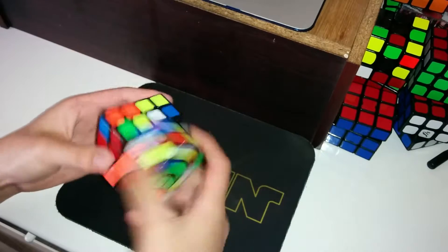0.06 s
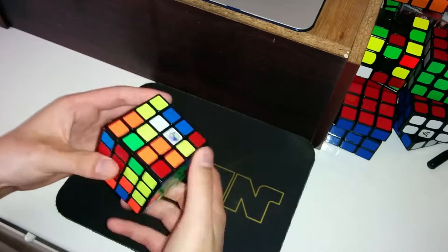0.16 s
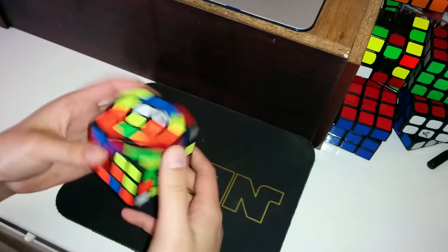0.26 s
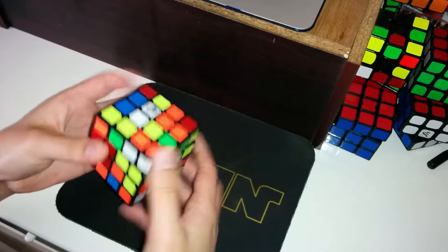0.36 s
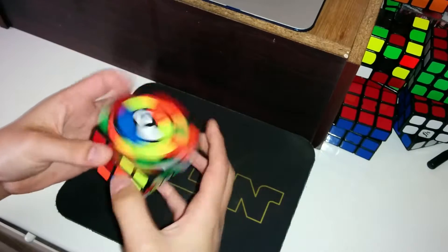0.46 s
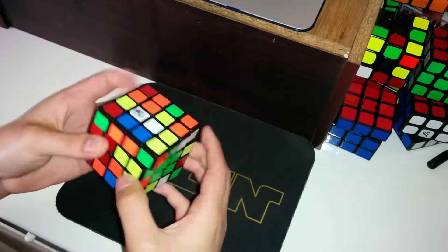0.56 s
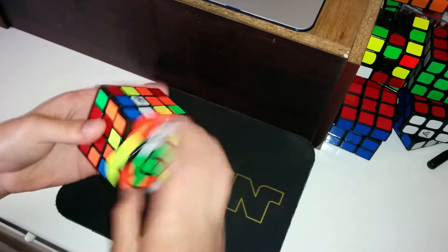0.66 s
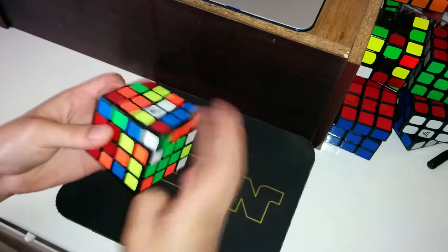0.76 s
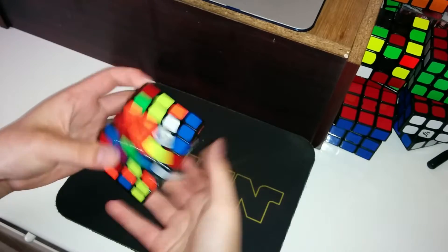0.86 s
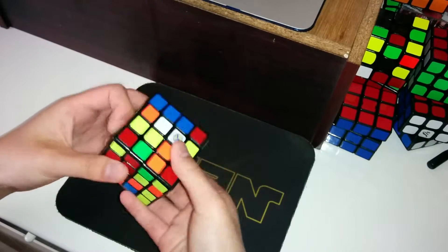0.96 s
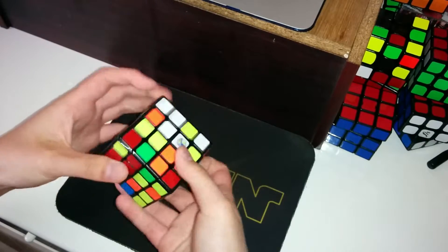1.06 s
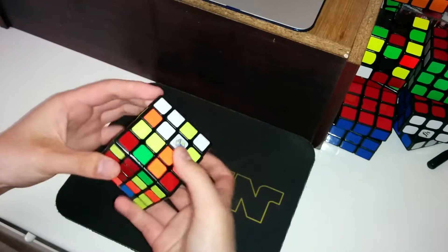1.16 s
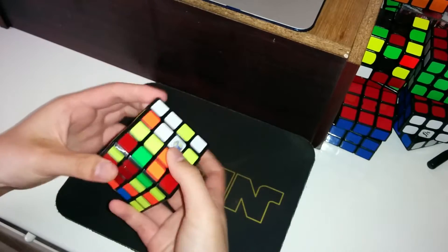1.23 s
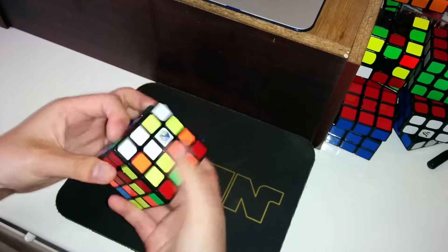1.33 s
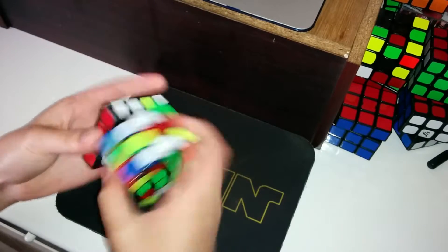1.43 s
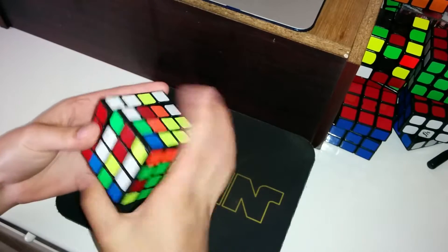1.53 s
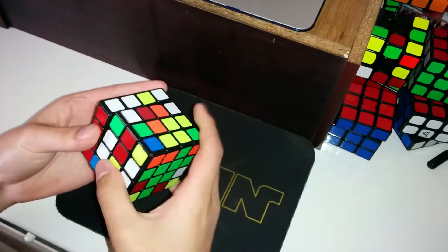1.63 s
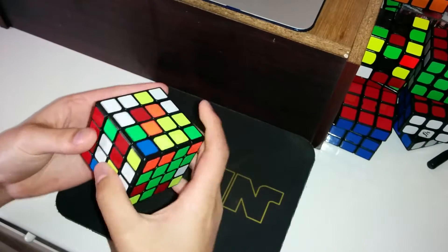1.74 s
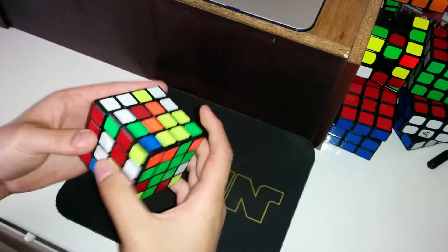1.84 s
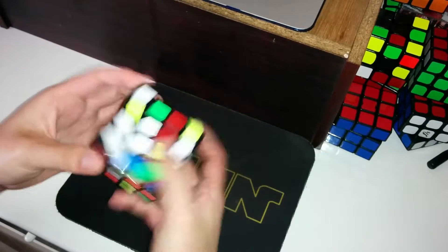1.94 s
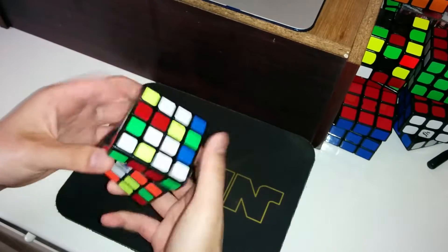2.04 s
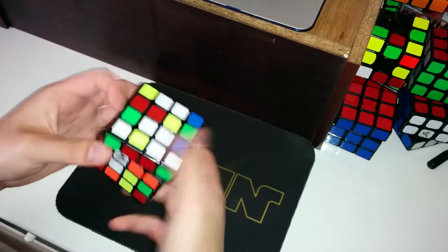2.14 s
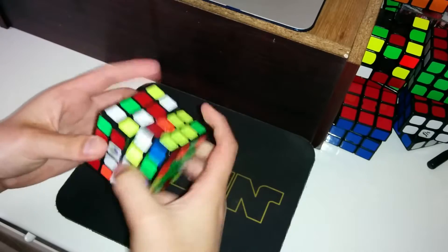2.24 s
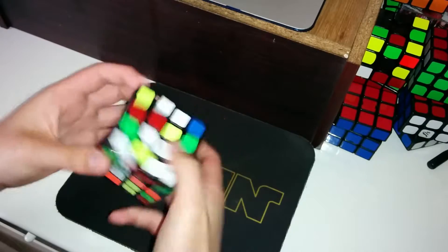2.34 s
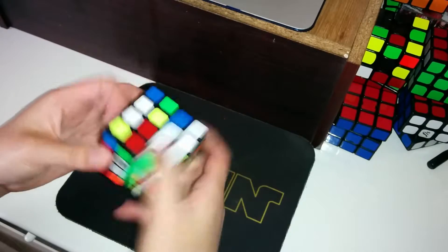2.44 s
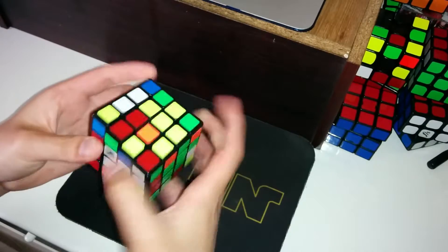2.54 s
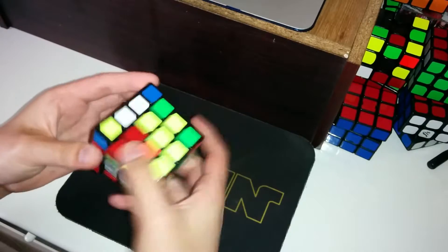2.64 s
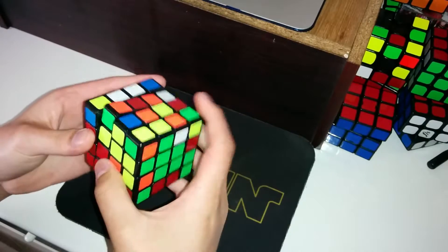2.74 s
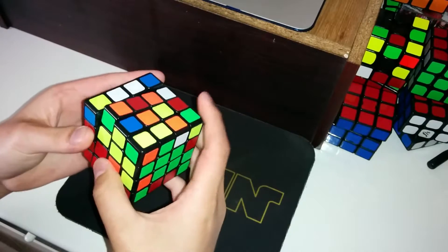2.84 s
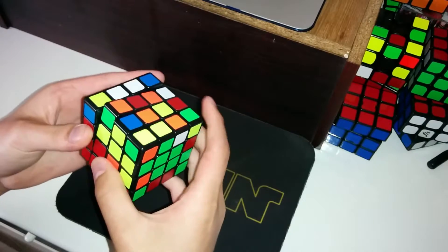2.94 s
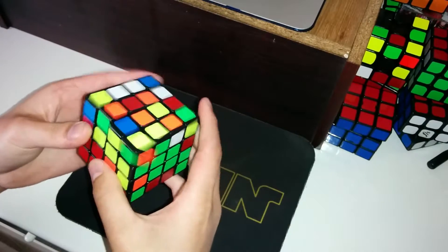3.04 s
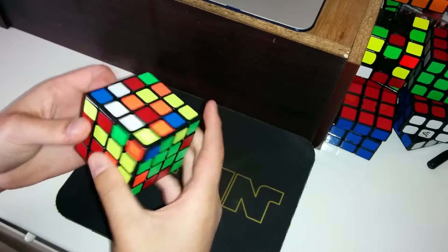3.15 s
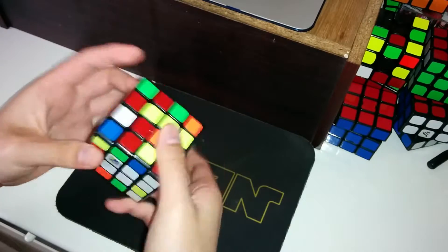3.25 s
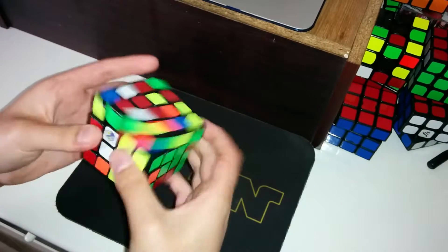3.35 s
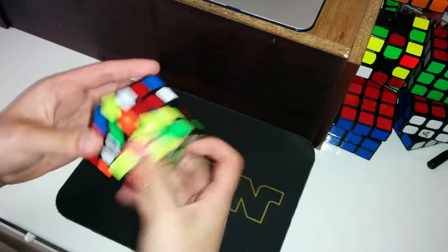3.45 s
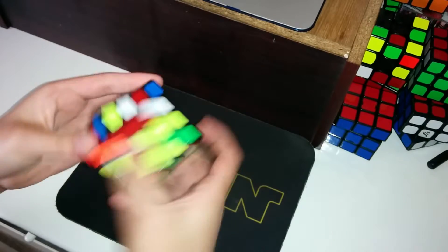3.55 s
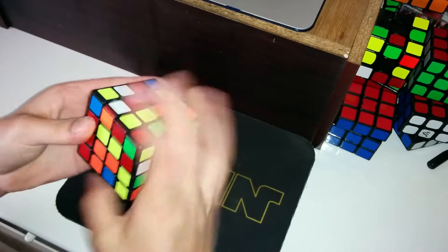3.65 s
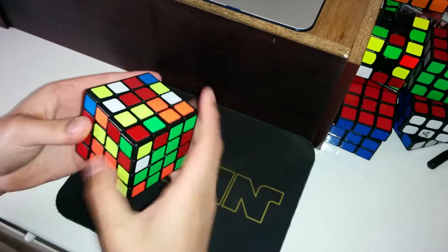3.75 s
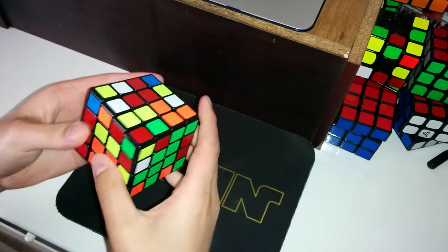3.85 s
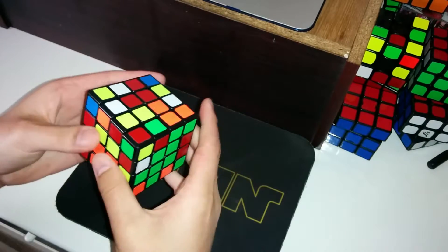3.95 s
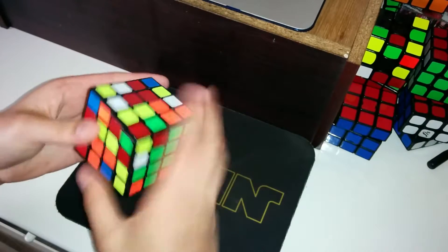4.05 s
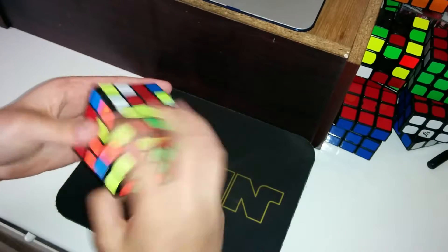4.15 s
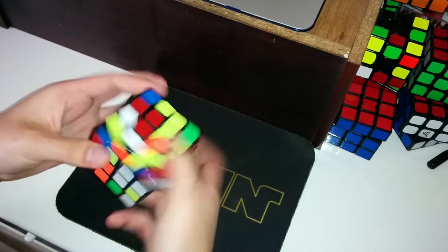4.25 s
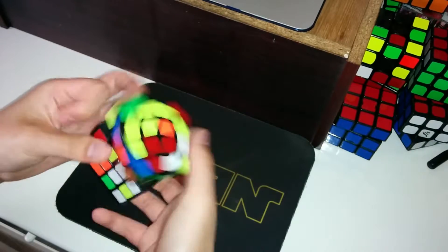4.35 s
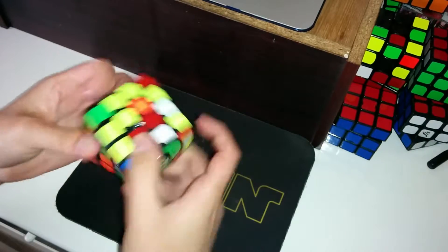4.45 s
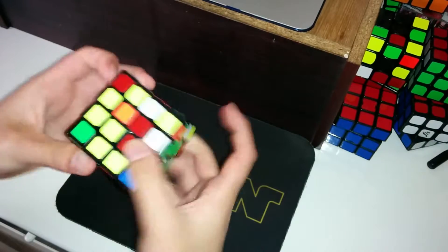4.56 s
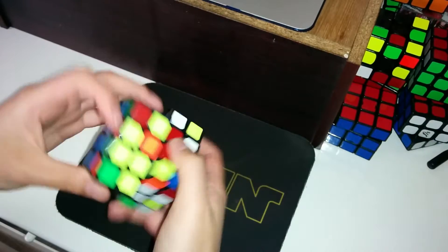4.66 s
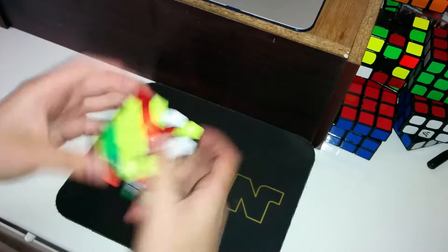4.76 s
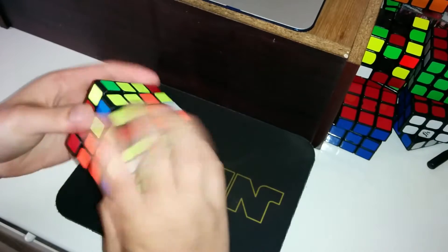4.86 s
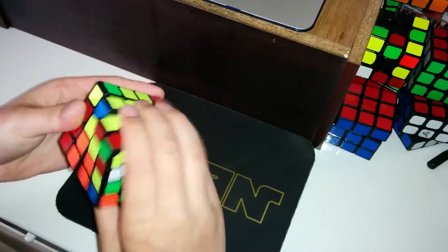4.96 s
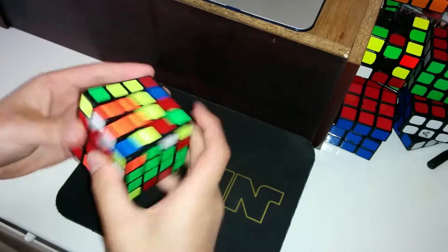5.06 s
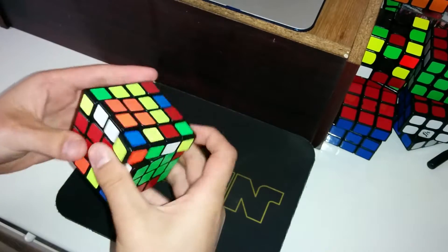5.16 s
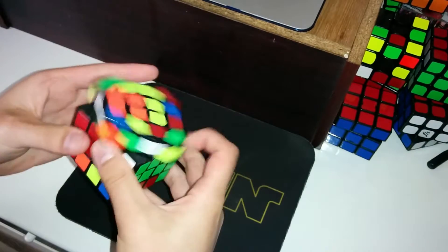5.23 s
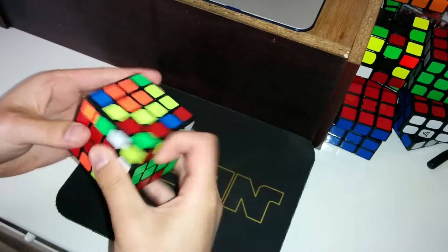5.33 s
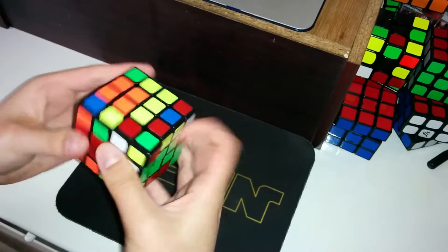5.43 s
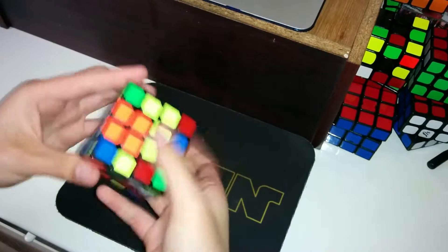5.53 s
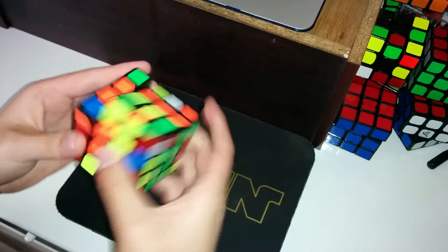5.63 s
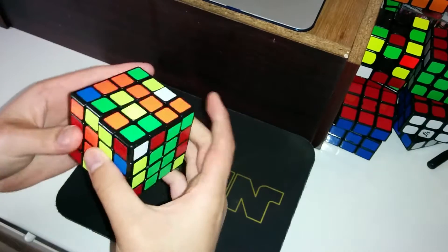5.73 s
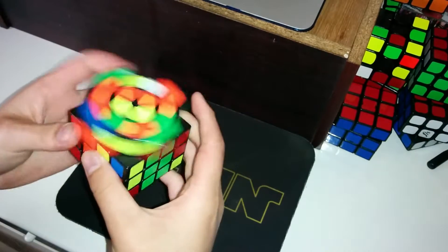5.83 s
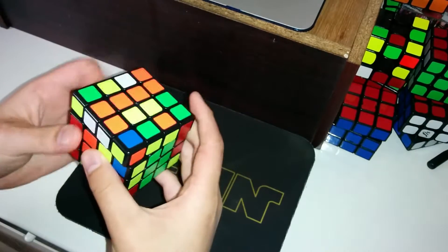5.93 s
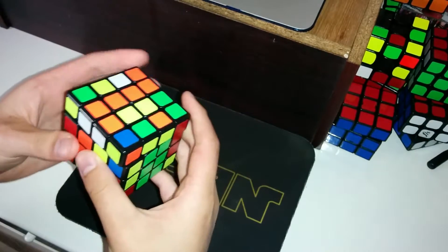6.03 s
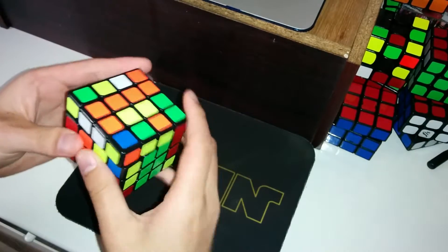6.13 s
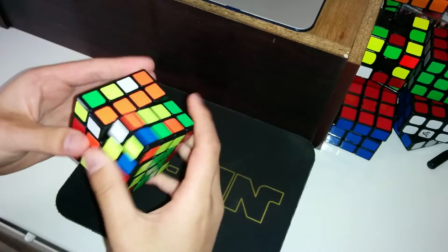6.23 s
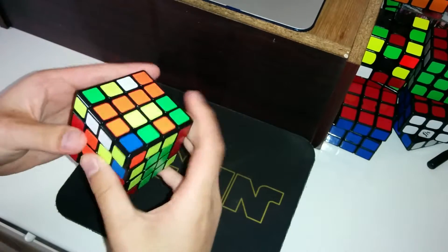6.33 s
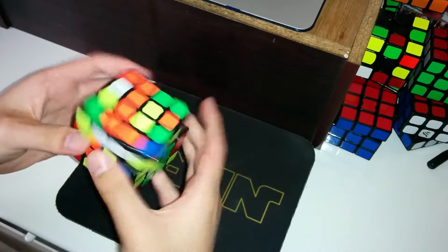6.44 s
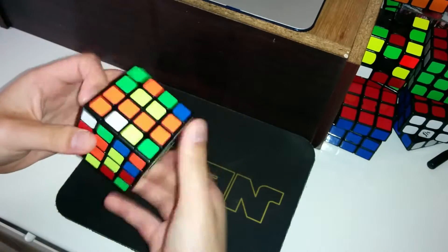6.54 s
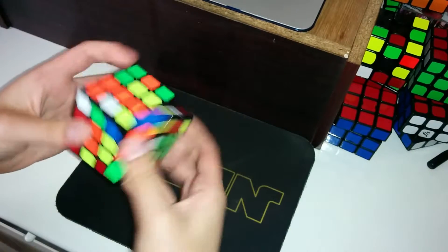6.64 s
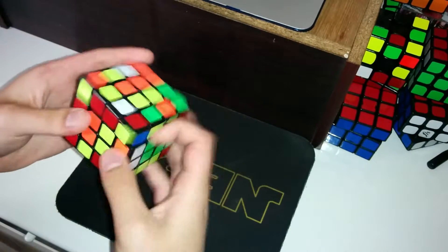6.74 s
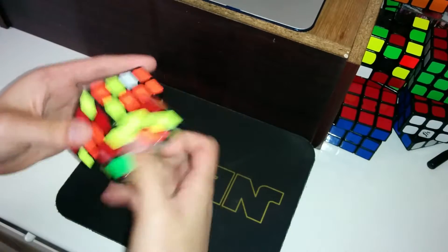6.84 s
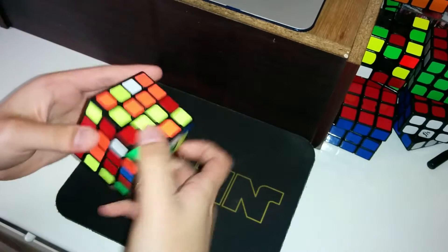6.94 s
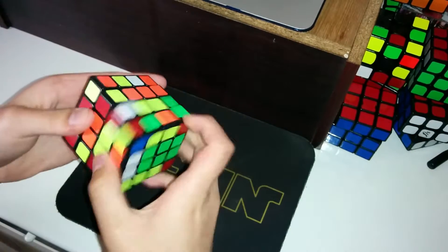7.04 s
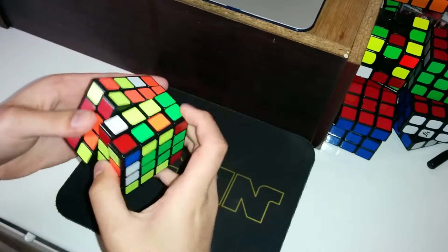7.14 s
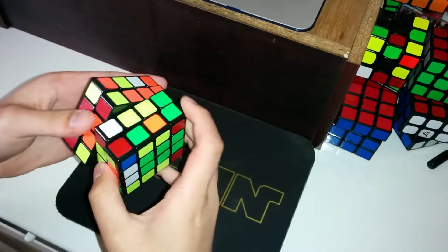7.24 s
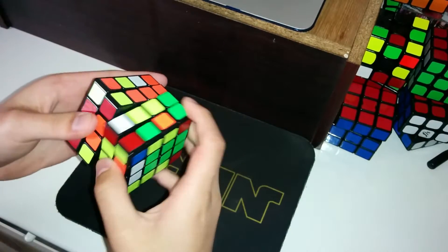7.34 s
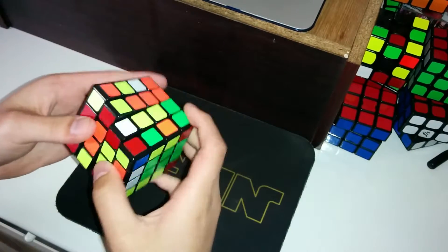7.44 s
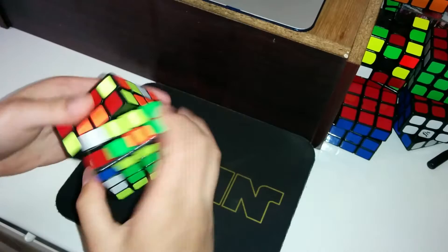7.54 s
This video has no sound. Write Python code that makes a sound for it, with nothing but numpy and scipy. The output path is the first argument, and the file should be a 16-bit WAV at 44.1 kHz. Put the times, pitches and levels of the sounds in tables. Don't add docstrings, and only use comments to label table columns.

```python
import sys
import numpy as np
from scipy import signal
from scipy.io import wavfile
from scipy.ndimage import uniform_filter1d

SR = 44100
rng = np.random.default_rng(int(sys.argv[2]) if len(sys.argv) > 2 else 0)


def materialize(psi):
    bounded = np.clip(np.atleast_2d(psi).T, -1, 1)
    quanta = np.round(bounded * 32767).astype(np.int16)
    wavfile.write(sys.argv[1], SR, quanta)


def nominal_scale(level):
    x = np.asarray(level, float) / 20
    return 10 ** x


N = 334719

RISE_S = .0012
# start_s, level_db, hollow_db, bright_db, ring_hz
KNOCKS = [(0.1771, -33.5, 4.5, -1, 1600), (0.2187, -42, -7, -2, 4600), (.9928, -43, -8, 0, 4600),
          (1.1722, -42, -8, 0, 4600), (2.0878, -28, -3, 0, 5000), (2.2927, -35, -8, 0, 4600),
          (2.3049, -38, -8, -0.5, 4600), (2.478, -35, -7.5, 0, 4600), (2.5423, -44, -8, 0, 4600),
          (2.572, -35, -8, 0, 4600), (2.8314, -48, -8, -7, 4200), (3.2225, -39, -8, -1, 4600),
          (3.3452, -36, -8, -0.5, 4600), (3.4772, -29, -2.5, -0.5, 5000), (3.615, -52, -8, 0, 4598),
          (4.3168, -41, -8, 0, 4600), (5.003, -45, -3.5, -5, 4600), (5.3307, -45, -8, 0, 4600),
          (5.4495, -37, -16, -1, 5200), (6.569, -39.5, -10, 9.5, 9030), (6.776, -38, -8, 5, 11000),
          (6.9516, -42, -8, 0, 4600)]


def rms_one(x):
    return x / np.sqrt(np.mean(x ** 2) + 1e-20)


def drift(rate):
    r = np.exp(-80 * np.pi * rate / SR)
    slow = signal.lfilter([1], [1, -2 * r, r * r], rng.standard_normal(N // 40 + 2002))[2000:]
    return np.interp(np.arange(N) / 40, np.arange(len(slow)), rms_one(slow))


def resonance(x, hz, width_hz):
    r = np.exp(-np.pi * width_hz / SR)
    zeros = np.array([1, 0, -1]) * (1 - r * r) / 2
    poles = [1, -2 * r * np.cos(2 * np.pi * hz / SR), r * r]
    return signal.lfilter(zeros, poles, x)


def butter(x, order, edge_hz, kind):
    return signal.sosfilt(signal.butter(order, edge_hz, kind, fs=SR, output="sos"), x)


def banded_noise(spectrum, patchy_db, patch_rate):
    hz_points, db_points = np.transpose(spectrum)
    edges_hz = 20 * 2 ** np.arange(0, 9.8, 1 / 4)
    white = rng.standard_normal((2, N))
    out = 0
    for k, (low_hz, high_hz) in enumerate(zip(edges_hz, edges_hz[1:])):
        hz = np.sqrt(low_hz * high_hz)
        level_db = np.interp(np.log(hz), np.log(hz_points), db_points, left=-80)
        lumpiness = np.exp(-np.log(hz / 700) ** 2 / 2)
        flicker_db = patchy_db * drift(patch_rate) * lumpiness
        out = out + nominal_scale(level_db + flicker_db) * butter(white[k % 2], 2, [low_hz, high_hz], "band")
    return rms_one(out)


def cube():
    # pitch_hz, width_hz, level_db
    hollow_modes = [(410, 85, -13.5), (555, 210, -10.5), (956, 45, -1), (1240, 110, 4.5), (1600, 190, 0),
                    (1937, 130, -3.5), (2500, 740, -13.5)]
    shell_modes = [(2540, 460, -2.5), (2880, 370, -1), (3510, 860, 2), (4150, 430, 2.5), (4650, 460, 2.5),
                   (5260, 300, 0.5), (5680, 420, -1), (6500, 370, -1)]
    edge_modes = [(6700, 810, -5.5), (8950, 3000, 2), (9800, 350, -0.5), (10730, 430, -3),
                  (12240, 820, 0.5), (14800, 2100, -8)]
    start_s, level_db, hollow_db, bright_db, _, ring_hz = np.transpose(clacks())
    count, knocks = len(start_s), len(KNOCKS)
    turn_db, grip_db = slide_db()
    sliding = np.maximum(nominal_scale(2 * turn_db) - nominal_scale(2 * -58), 0)
    shared = contacts(per_s=4500, spread_db=6.2)
    colour_db = np.resize(rng.normal(0, 2.15, (count - knocks, 24)), (count, 24))

    blow_at = np.round((start_s + RISE_S) * SR).astype(int)
    hard_blow_db = 10.5 + 0.29 * (level_db + 24)
    blow_db = np.where(np.arange(count) < len(hard_clacks()), hard_blow_db, 4)
    blow_db[-knocks:] = 8

    # modes, clack_db, sliding_db, decay share (treble dies first), extra blow_db
    parts = [(hollow_modes, hollow_db + 11.5, grip_db + 1.1, .38, 3),
             (shell_modes, 2.5, 1.0, .34, 0),
             (edge_modes, bright_db + 1.5, -1.1, .3, 0)]
    out, k = 0, 0
    for modes, part_db, slide_gain_db, quick, snap_db in parts:
        for hz, width_hz, mode_db in modes:
            favoured_db = 10.4 * np.exp(-(np.log(hz / ring_hz) / 0.062) ** 2)
            strength_db = level_db + part_db + colour_db[:, k] + favoured_db
            power = rattle(strength_db, quick, tail_db=-13.5, tail_t60_s=0.11)
            grip_change_db = 4.5 * drift(38)
            power += sliding * nominal_scale(2 * slide_gain_db + 2 * grip_change_db)
            own = contacts(per_s=6400, spread_db=5.0)
            drive = np.sqrt(power) * (0.55 * shared + 0.78 * own)
            drive[blow_at] += nominal_scale(strength_db + blow_db + snap_db)
            out = out + (-1) ** k * nominal_scale(mode_db) * resonance(drive + 1e-18, hz, width_hz)
            k += 1
    out = butter(out, 1, 730, "high")
    return butter(out, 8, 385, "high")


def contacts(per_s, spread_db):
    sizes = nominal_scale(spread_db * np.minimum(rng.exponential(1, N), 3.2)) * rng.choice([-1, 1], N)
    return rms_one(sizes * (rng.random(N) < per_s / SR))


def slide_db():
    # push_s, fastest_s, push_db, top_db, hollow_db
    layer_turns = [(0.162, 0.18, -45, -36, .1), (.372, 0.42, -40, -37.5, 1.5),
                   (0.566, 0.58, -40.5, -30.5, 1), (0.747, 0.8, -42, -39.5, -1),
                   (0.822, 0.86, -40.5, -26, -1.5), (0.979, 1.032, -53, -36, 0.5),
                   (1.128, 1.158, -57, -43, -3), (1.38, 1.408, -46, -28.5, 1),
                   (1.49, 1.576, -40.5, -43.5, 2), (2.031, 2.094, -45.5, -27, -1),
                   (2.25, 2.324, -49.5, -37.5, .1), (2.408, 2.428, -45, -45.5, .1),
                   (2.459, 2.497, -42.5, -29, 0.5), (2.543, 2.586, -43.5, -33.5, 1),
                   (3.175, 3.211, -45.5, -39.5, 0.5), (3.286, 3.4, -43.5, -46.5, .1),
                   (3.39, 3.46, -57, -34, -2), (3.5, 3.59, -33.5, -39, .1), (3.656, 3.73, -38, -40, .1),
                   (4.293, 4.4, -46, -28.5, 0.2), (4.44, 4.514, -34, -45, -2), (4.55, 4.54, -42.5, -54, 1),
                   (4.688, 4.706, -53.5, -50, .1), (4.854, 4.96, -36.5, -31.5, 1),
                   (5.321, 5.3, -50.5, -48, 1), (5.426, 5.43, -51.5, -51, -6), (5.542, 5.54, -58, -48, -9),
                   (5.692, 5.717, -48, -29.5, 2), (5.928, 5.953, -52, -35.4, -1),
                   (6.566, 6.578, -47, -35.5, -3), (6.702, 6.83, -44.5, -40.5, 0.5),
                   (6.935, 6.955, -51.5, -52, 2), (7.076, 7.07, -58, -51, .1)]
    start_db_s, slowing_db_s = 1801, 360
    t = np.arange(N) / SR
    level_db, hollow_db = np.full(N, -99.), np.zeros(N)
    for push_s, fastest_s, push_db, top_db, grip_db in layer_turns:
        speeding_db = np.interp(t, [push_s, max(fastest_s, push_s + RISE_S)], [push_db, top_db])
        before_db = start_db_s * np.maximum(push_s - t, 0)
        after_db = slowing_db_s * np.maximum(t - fastest_s, 0)
        turn_db = speeding_db - before_db - after_db
        hollow_db = np.where(turn_db > level_db, grip_db, hollow_db)
        level_db = np.maximum(level_db, turn_db)
    return level_db, hollow_db


def rattle(strength_db, quick, tail_db, tail_t60_s):
    lead = SR // 40
    power = np.zeros(N + SR)
    t = (np.arange(SR // 6) - lead) / SR
    after = np.maximum(t, 0)
    grinding = nominal_scale(2 * (-11.0 + 5000 * np.minimum(t, 0)))
    attack = np.maximum(np.minimum(after / RISE_S, 1) ** 2, grinding)
    tail = nominal_scale(2 * tail_db - 120 * after / tail_t60_s)
    for (start_s, _, _, _, t60_s, _), level_db in zip(clacks(), strength_db):
        shape = nominal_scale(-120 * after / max(t60_s * quick, .01)) + tail
        i = round(start_s * SR) - lead
        power[i:i + len(t)] += nominal_scale(2 * level_db) * shape * attack
    return power[:N]


def clacks():
    # start_s, level_db, bright_db, ring_hz
    light_ticks = [(0.1276, -51.5, -20, 5160), (0.147, -46.5, -10, 5860), (0.3773, -44, -8, 9400),
                   (0.39, -37, 4, 4400), (0.473, -50.5, 7, 3960), (0.484, -50, -8.0, 3880),
                   (0.5375, -51, 5.5, 8960), (0.551, -48, 7.5, 3270), (0.743, -32.5, -1, 6030),
                   (1.103, -57, 10, 3860), (1.1124, -42, 3, 11900), (1.215, -47.5, 1, 5130),
                   (1.255, -68, 8, 10340), (1.754, -66.0, -1.5, 2670), (1.974, -49.5, -4.0, 3960),
                   (1.9816, -41.5, 2, 12300), (2.003, -49, -9, 4200), (2.014, -42, -4.0, 3270),
                   (2.1568, -39, 2, 4300), (2.1666, -42, 5, 7840), (2.2427, -39, -16.0, 3700),
                   (2.302, -40, 0.5, 3360), (2.3763, -47, 1.0, 2760), (2.391, -41.5, 5.5, 2500),
                   (2.634, -50, -11, 4600), (2.749, -58, 7, 3080), (2.765, -52.5, 2, 10420),
                   (2.786, -51, 2, 10420), (2.798, -38.5, -5.0, 4000), (2.8103, -36, -2.5, 4150),
                   (3.176, -38, -13, 5280), (3.227, -40, 8.5, 10510), (3.237, -34.5, -3, 5340),
                    (3.3033, -34.5, -3.0, 4300), (3.327, -34, 4.5, 6550), (3.6, -46, 0.0, 4650),
                    (3.758, -47.5, 8.5, 10800), (4.183, -71.5, 11.5, 3220), (4.2484, -58.5, 6, 10250),
                    (4.264, -53, 0, 2900), (4.278, -52, -1, 4130), (4.289, -56, 6.0, 8530),
                    (4.324, -35, -2.0, 5680), (4.5117, -41, -2.0, 5680), (4.523, -34, -10, 6160),
                    (4.599, -57.5, 13.5, 8180), (4.694, -44, 5, 8270), (4.701, -38, -1, 4500),
                    (4.71, -45, -7, 4300), (4.722, -39, -11, 4840), (4.741, -53, 8, 7580),
                    (4.7637, -66, 13.5, 8960), (4.775, -61, 14, 8540), (4.7845, -63, 10.0, 8790),
                    (4.791, -52, 14, 10080), (4.7968, -55.5, 5, 8530), (4.8412, -46.5, 10, 9900),
                   (5.098, -42, 6.5, 11110), (5.119, -43, 2, 8340), (5.1237, -38.5, -4, 3500),
                  (5.1434, -39.5, -3, 4630), (5.159, -63, 14.5, 3960), (5.301, -58, 3, 9730),
                  (5.325, -40.5, -6, 3640), (5.3596, -35, -10.0, 6000), (5.4155, -59, 10.0, 9730),
                  (5.427, -42.5, 10, 9600), (5.445, -40.0, 3, 5330), (5.516, -60.5, 14, 8500),
                  (5.538, -53, 16, 10680), (5.5483, -37.5, 3.5, 4290), (5.564, -50.5, 10.5, 3560),
                  (5.679, -49.5, -5, 3530), (5.706, -42, 5.0, 8750), (5.822, -63, 6, 7950),
                  (5.92, -51.5, 8, 11630), (5.936, -41, 4, 4390), (6.393, -69, 10.5, 3100),
                  (6.5452, -43.5, 2, 3190), (6.631, -53, 12, 3450), (6.638, -35.5, 5, 5000),
                  (6.6762, -66, 6, 8960), (6.6862, -51, 3.5, 10160), (6.699, -35, -8, 3790),
                  (6.707, -35.5, -6, 4020), (6.8467, -39, -9.0, 3190), (6.901, -52.5, 7, 11370),
                  (6.956, -39.5, 4, 3340), (7.039, -53.5, 0.0, 5240), (7.124, -34, -10, 6330)]
    blows = [(s, db, hollow_db, bright_db, 0.065 * np.exp(0.01 * (db + 25.5)), hz)
             for s, db, hollow_db, bright_db, hz in hard_clacks()]
    ticks = [(s, db, -8.5, bright_db, 0.071, hz)
             for s, db, bright_db, hz in light_ticks]
    knocks = [(s, db, hollow_db, bright_db, 0.044, hz) for s, db, hollow_db, bright_db, hz in KNOCKS]
    return blows + ticks + knocks


def hard_clacks():
    # start_s, level_db, hollow_db, bright_db, ring_hz
    snaps = [(0.1795, -33, 3, -6, 3835), (0.1922, -24.5, -14, 0.5, 5040), (0.1996, -33.5, 1, 0, 6000),
             (0.3948, -23.5, -7.5, -4.0, 2960), (0.4063, -30, -2, 4, 9860), (0.431, -31, -15, -3, 4670),
             (0.5728, -22, -6.5, -7.5, 3578), (0.5846, -24.5, -9, -3.5, 4444),
             (0.6042, -25, -9, 0.0, 4430), (0.7713, -24, -8, -1, 4150), (0.7871, -23.5, -6.5, 1.5, 4400),
             (0.8296, -34, 0.5, 6, 10300), (0.8448, -31.5, -4, 1, 12100), (0.8553, -18.5, -12, 7, 7000),
             (0.872, -23, -18.5, 5.5, 11210), (0.926, -44.5, -12.5, 12, 7400),
             (1.0003, -31, -4, 2.5, 10700), (1.0082, -20.0, -17.5, -10, 3058),
             (1.0213, -20.0, -10.5, 2.5, 4870), (1.0383, -28.5, -14.5, 1.5, 4720),
             (1.1405, -35.0, -14, 0, 8400), (1.1451, -28, -19, 5.5, 4350), (1.1602, -27, -6, 0, 4600),
             (1.3846, -30, -6.5, 2, 2730), (1.4095, -18, -14, -5.5, 2945), (1.4225, -21, -12, -8, 4190),
               (1.486, -33, 0, 4, 4042), (1.5023, -28, -1, -0.5, 5230), (1.5112, -27, -3, 5, 9560),
               (1.522, -29.5, 4.5, -2.5, 2500), (1.549, -33.5, -0.5, 2.5, 4100),
               (1.5572, -31.5, -2.0, 2, 4000), (1.582, -27.5, -8.5, -8.5, 3000),
               (2.0383, -29, -2.5, -7, 4650), (2.0684, -40.0, -14.5, -3, 4720), (2.077, -33, -8, -2, 8640),
               (2.0814, -17.5, -14, 2, 5000), (2.103, -19, -20, 2, 5064), (2.2576, -33, -12, 4, 9530),
               (2.2865, -24.5, -12, -3, 5100), (2.3111, -21, -11, 3.5, 3970),
               (2.3279, -37, -16.5, -1, 3516), (2.4115, -27.5, -8, 2, 6940), (2.483, -23, -28, 10, 3850),
               (2.4902, -21, -13, 2, 5610), (2.5018, -26, -9.5, -1, 2990), (2.5222, -31, -5, 1.0, 5280),
               (2.5556, -30.0, -7.5, -2.5, 3960), (2.579, -20, -20, -1.5, 5680),
               (2.591, -26, -7.5, 4.5, 4300), (2.599, -26.5, -5, -3, 4360), (2.8185, -29, -5, -13, 4093),
             (3.2055, -31.5, -20, 1, 5240), (3.2852, -36.5, -5, 2.5, 4200),
                 (3.3484, -26.5, -11, 3, 4700), (3.392, -20.5, -9, -3, 4710), (3.4157, -21, -6, -4, 5136),
                 (3.429, -28, -9.5, 4.5, 9830), (3.4348, -32.5, 5, 0.5, 3540),
                 (3.4684, -30.5, -17.5, -5, 7490), (3.485, -17.5, -9.5, 3.5, 10040),
                 (3.4968, -21.5, -21.5, -2.0, 4660), (3.5191, -19.5, -7.5, 2.5, 4850),
                 (3.5361, -38.5, -9, 1.5, 4730), (3.552, -38, -10, 0.0, 4735), (3.5654, -27, -3.5, 6, 6500),
                 (3.585, -33.5, 0.5, -2, 4610), (3.6515, -26, -5.5, -1.5, 5650),
                 (3.6757, -26.5, -15, -1.5, 6750), (3.6857, -23, -10, -3.5, 4867),
                 (3.6994, -16.5, -9.5, -4.5, 5610), (3.7187, -34.0, 2.5, 2, 9150),
                 (3.731, -27.5, -5, 0.5, 4060),
             (4.298, -36, -6, 3.5, 8650), (4.306, -36.0, -8, 0, 8300), (4.329, -39.5, -1, -2.0, 4120),
                (4.3407, -36.5, 4.5, -4.5, 4350), (4.3518, -25, -1, 0.5, 5800),
                (4.3714, -30.0, -14.5, 1.5, 5150), (4.3813, -28.5, -10, -1.5, 5050),
                (4.3858, -25.5, -8.5, -1, 4650), (4.3934, -17.5, -9.5, 3.5, 7400),
                (4.403, -24, -21.5, 2.5, 4940), (4.4101, -25.0, -10, 4.5, 8530),
                (4.421, -22.5, -9.5, 6.0, 9470), (4.4585, -25.5, -4.5, 1, 2880),
                (4.4833, -30, -21.0, 2, 4380), (4.5558, -25.5, -19, 0.5, 4250),
                (4.564, -36.5, -7, -8, 4130), (4.8555, -28, 1, 4.5, 2540), (4.8614, -23, -13, -1, 5395),
                (4.8784, -13.5, -8, -1, 4910), (4.8925, -20.5, -2.5, 5, 6500),
                (4.9011, -15.5, -11.5, 2, 6510), (4.905, -22.5, -5, -1, 6500),
                (4.9187, -16.5, -13.5, 1, 6600), (4.9324, -22.5, -7.5, 0.5, 6150),
                (4.937, -24, -1, -3.5, 3900), (4.9482, -29, -13.5, 0.5, 4770), (4.9755, -29, -1, -3, 4770),
             (5.3392, -32, -2.5, 2, 3520), (5.343, -34, -5, 4.5, 3930), (5.7183, -23, -7.5, 3, 4156),
                (5.7385, -21, -14, -1, 4320), (5.7613, -33, -6, -1.5, 5500), (5.9444, -34.5, -1, 0, 4670),
                (5.961, -23.5, -13, 1.5, 4935), (6.5728, -34, -17, -7.5, 4760), (6.586, -26, -10, 2, 10020),
                (6.7317, -30, -4, -3.5, 3130), (6.7518, -23.5, -19, -5, 4320), (6.789, -25, -5, 3, 4430),
                (6.7991, -21, -6.5, -0.5, 3870), (6.8164, -25.5, -5, -2.5, 4140),
                (6.8265, -35, -4, 0.5, 4200), (6.9472, -38, -8.5, 10.5, 8536),
                (7.0844, -45.5, 10.5, 9, 4970), (7.096, -41, 1, -4.0, 4270), (7.1165, -33.5, -9, 1, 5900)]
    return snaps


def gate(x, knee_db, slope):
    level_db = 10 * np.log10(uniform_filter1d(x ** 2, size=300) + 1e-12)
    return x * nominal_scale(slope * np.minimum(level_db - knee_db, 0))


def squeak():
    # start_s, length_s, from_hz, to_hz, level_db (rms)
    slip = (.521, .024, 4900, 4200, -68)
    start_s, length_s, from_hz, to_hz, level_db = slip
    share = np.clip((np.arange(N) / SR - start_s) / length_s, 0, 1)
    phase = 2 * np.pi * np.cumsum(from_hz + (to_hz - from_hz) * share) / SR
    envelope = np.sqrt(np.abs(np.sin(np.pi * share))) * (share < 1)
    return np.sqrt(2) * nominal_scale(level_db) * envelope * np.sin(phase)


def puffs(source):
    stirred = rms_one(np.abs(source) * rng.standard_normal(N))
    return nominal_scale(-64.5) * butter(stirred, 2, 300, "low")


def echo(source):
    # pitch_hz, level_db (per Hz)
    echo_spectrum = [(1500, -18), (2500, -13), (4000, -9), (5700, -17.5), (7200, -5.5), (9500, -1),
                     (16000, -10.5)]
    cap_db, fall_db_s = -68, 78
    t = np.arange(N) / SR
    source_db = 10 * np.log10(uniform_filter1d(source ** 2, size=400) + 1e-12)
    moving_db = np.minimum(source_db - 0.5, cap_db)
    moving_db[0] = cap_db
    level_db = np.maximum.accumulate(moving_db + fall_db_s * t) - fall_db_s * t
    return nominal_scale(level_db) * banded_noise(echo_spectrum, patchy_db=-17.0, patch_rate=11)


def air_modes():
    # pitch_hz, width_hz, level_db (rms)
    murmur_modes = [(419, 64, -77.5), (549, 86, -77.5), (792.6, 110, -79), (960, 87, -88.5)]
    # start_s, level_db
    swell_points = [
        (0.0, -74.5),
        (2.16, -73),
        (2.41, -67),
        (3.06, -76),
        (3.51, -67),
        (3.93, -79.5),
        (4.54, -70),
        (6.41, -79),
        (6.79, -75.5),
        (7.59, -79),
    ]
    out = 0
    for hz, width_hz, level_db in murmur_modes:
        once = resonance(rng.standard_normal(N), hz, width_hz)
        murmur_db = 3 * drift(12)
        out = out + nominal_scale(level_db + murmur_db) * rms_one(resonance(once, hz, width_hz))
    swell_db = np.interp(np.arange(N) / SR, *np.transpose(swell_points))
    return nominal_scale(swell_db - swell_db.mean()) * out


def rumble():
    # pitch_hz, level_db (per Hz)
    room_spectrum = [(25, -28), (130, -22.5), (350, -32.5), (400, -15), (1000, -19), (1400, -26.5),
                     (4500, -35.5), (16000, -44)]
    return nominal_scale(-72.5) * banded_noise(room_spectrum, patchy_db=2.5, patch_rate=29)


def mains_hum():
    # multiple, level_db (rms), wobble_db
    harmonics = [(1, -87, 1.5), (2, -83.5, .7), (3, -85.5, .8), (4, -90, 1.5)]
    t = np.arange(N) / SR
    out = 0
    for multiple, level_db, wobble_db in harmonics:
        tone = np.sin(2 * np.pi * (multiple * 100 * t + rng.random()))
        out = out + np.sqrt(2) * nominal_scale(level_db + wobble_db * drift(3.0)) * tone
    return out


def scene():
    near = gate(cube(), knee_db=-50.0, slope=0.3)
    room = air_modes() + rumble() + mains_hum()
    return (near + squeak() + puffs(near) + echo(near) + room)[None]


def roll_off(x):
    return signal.sosfilt(signal.butter(12, 16970, fs=SR, output="sos"), x)


def record(dry):
    top_cut = signal.ellip(10, .5, 45, 15900, fs=SR, output="sos")
    mix = signal.sosfilt(top_cut, dry) - .0003
    return roll_off(mix)


dry = scene()
out = record(dry)
materialize(out)
```